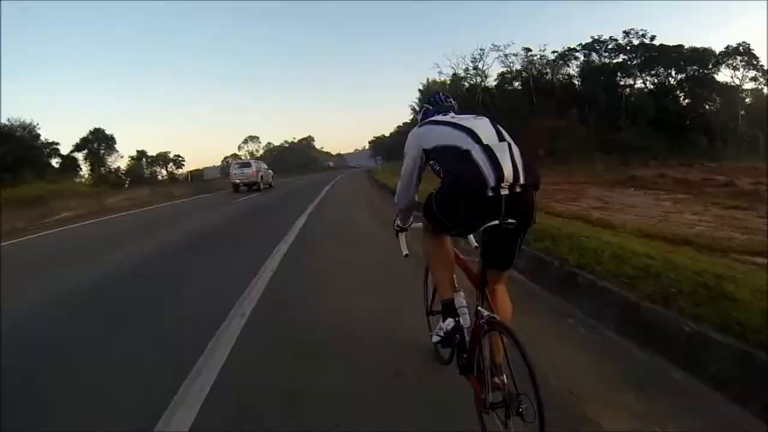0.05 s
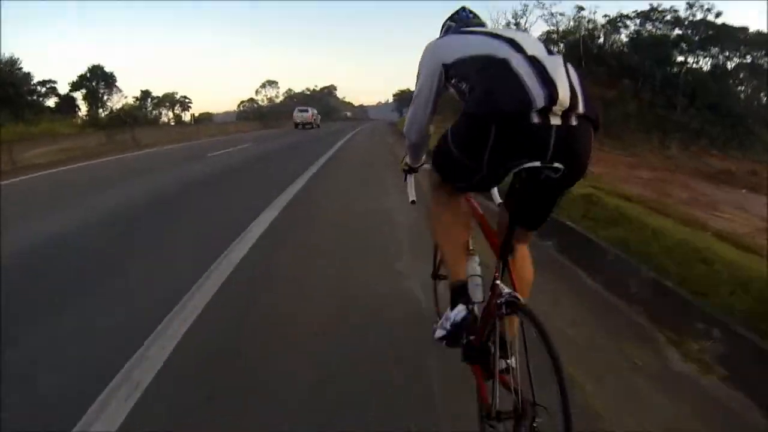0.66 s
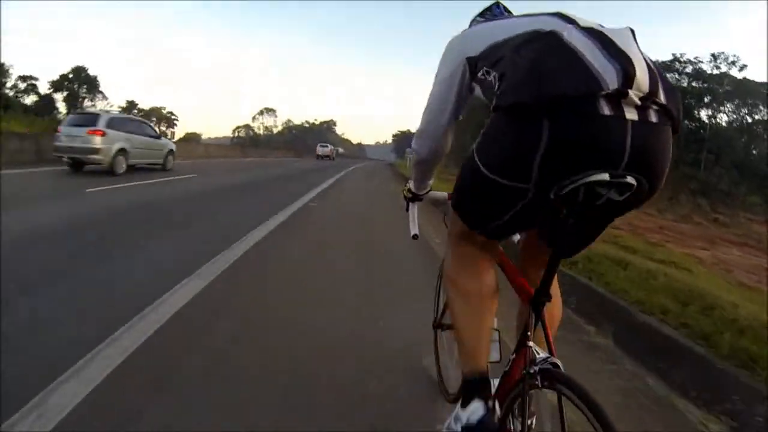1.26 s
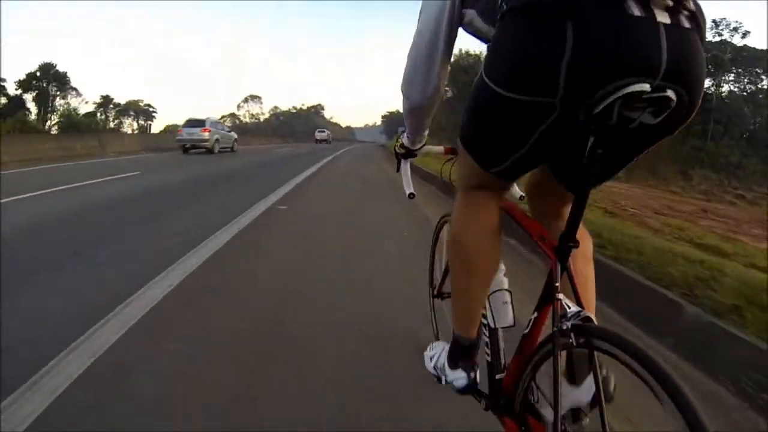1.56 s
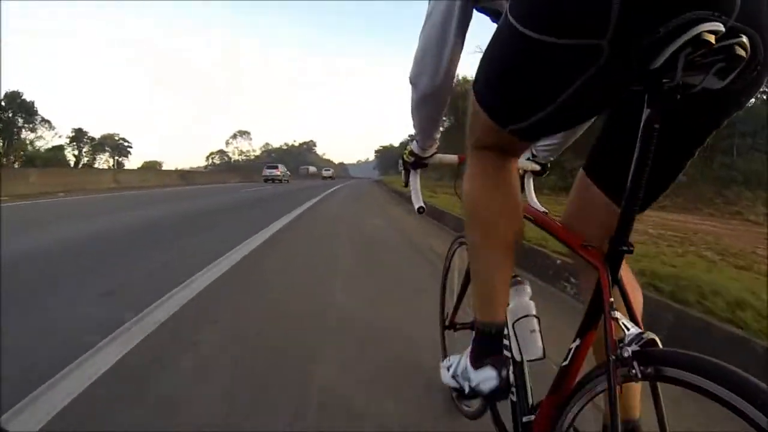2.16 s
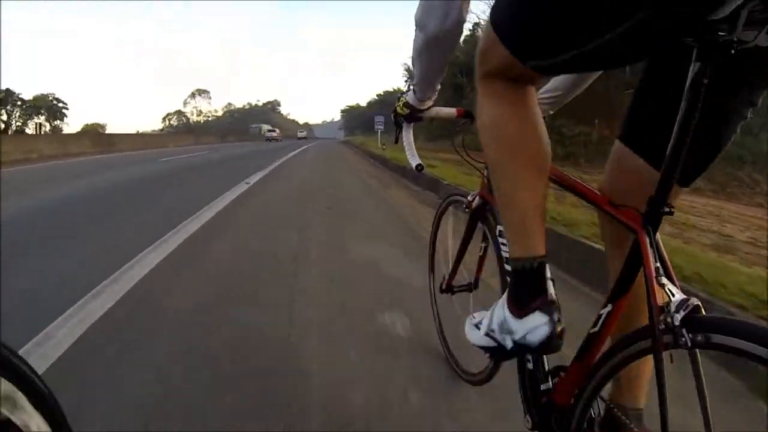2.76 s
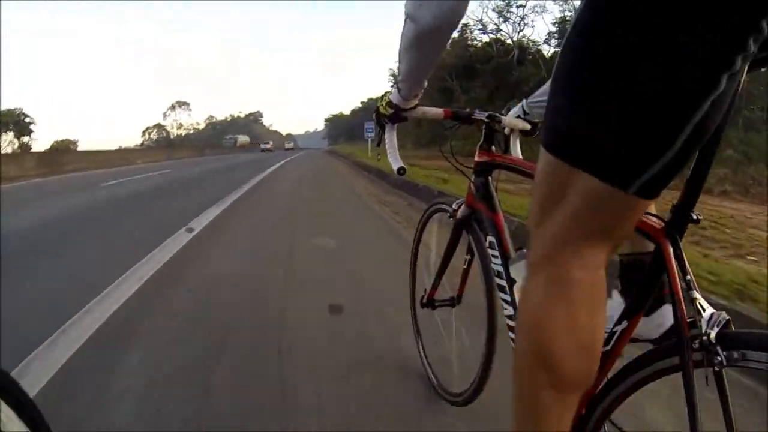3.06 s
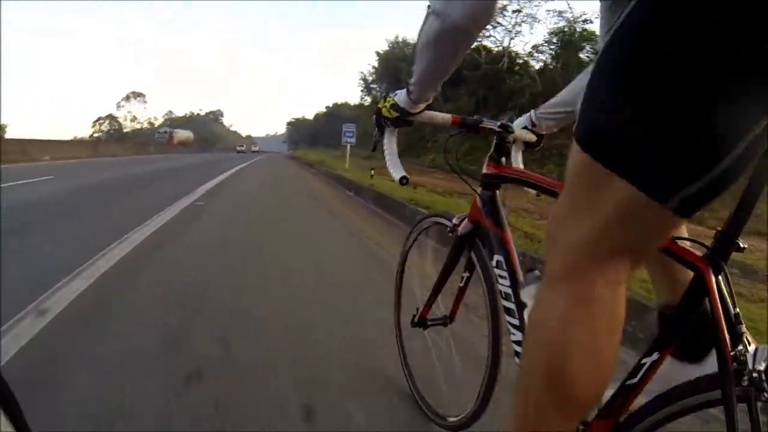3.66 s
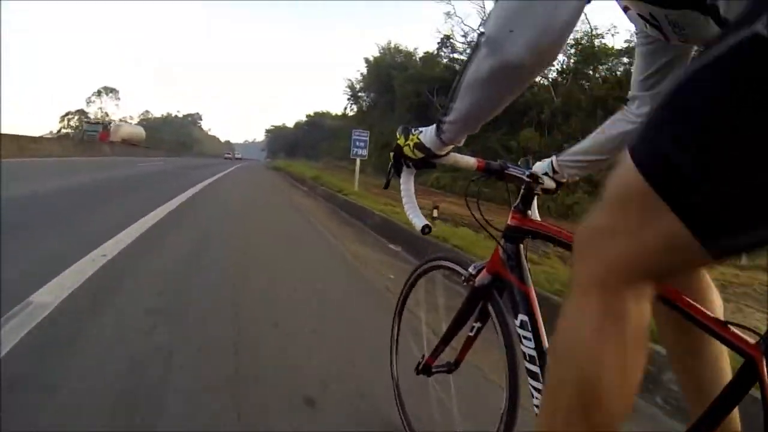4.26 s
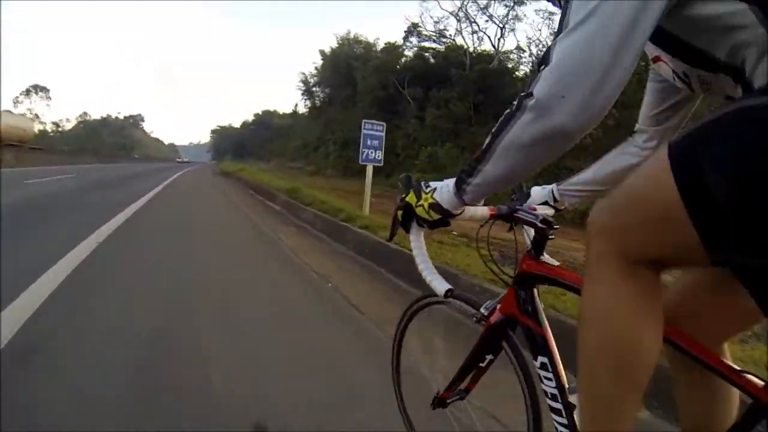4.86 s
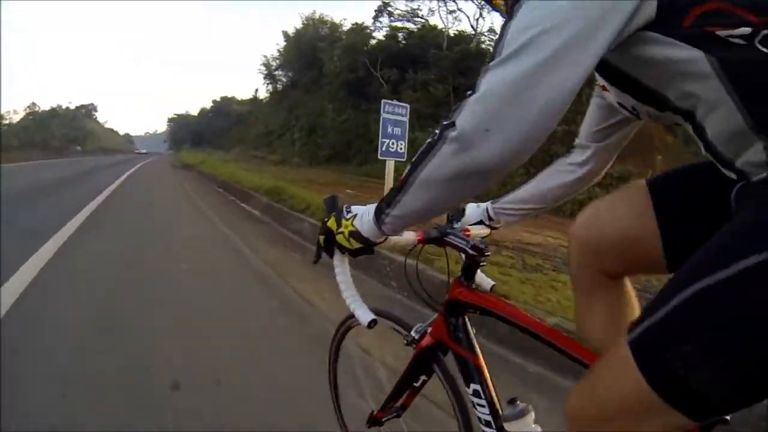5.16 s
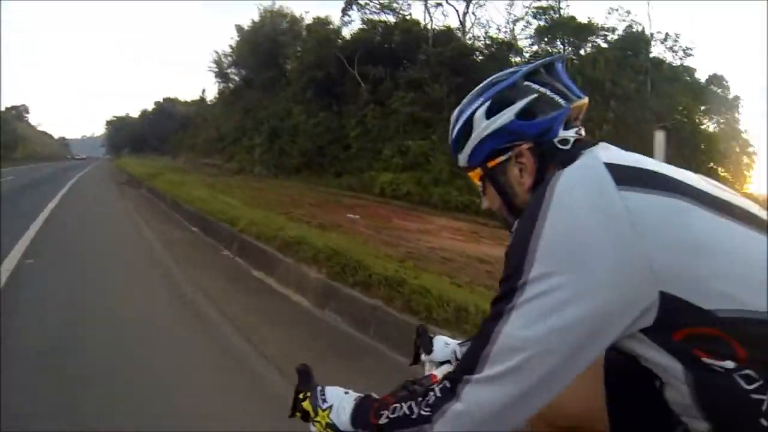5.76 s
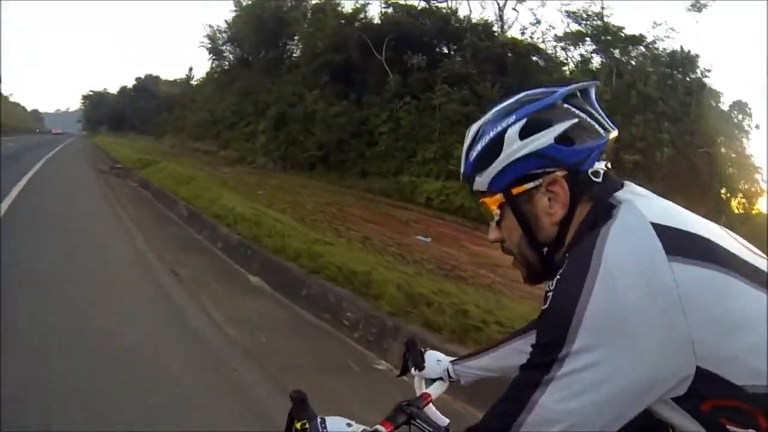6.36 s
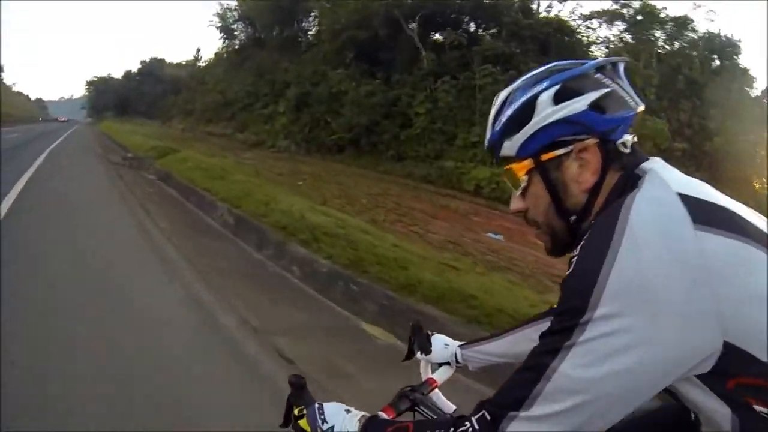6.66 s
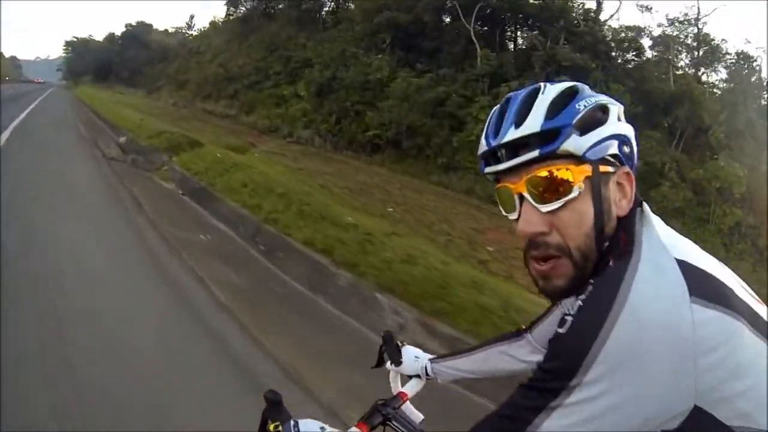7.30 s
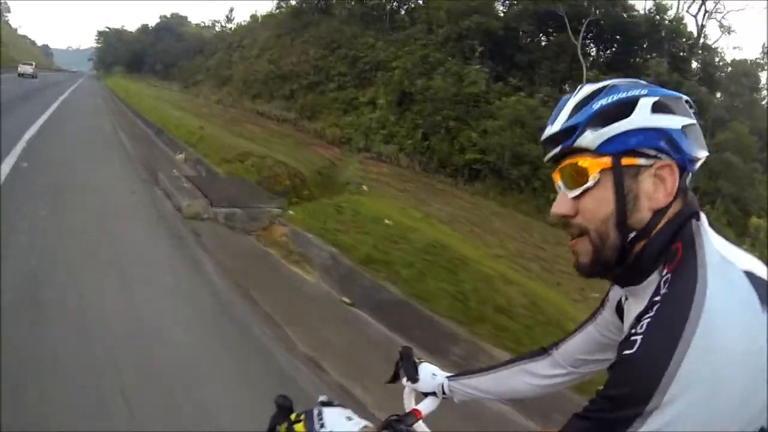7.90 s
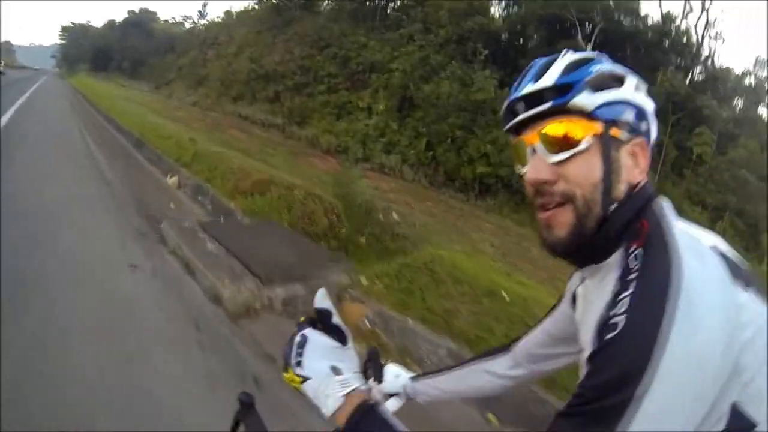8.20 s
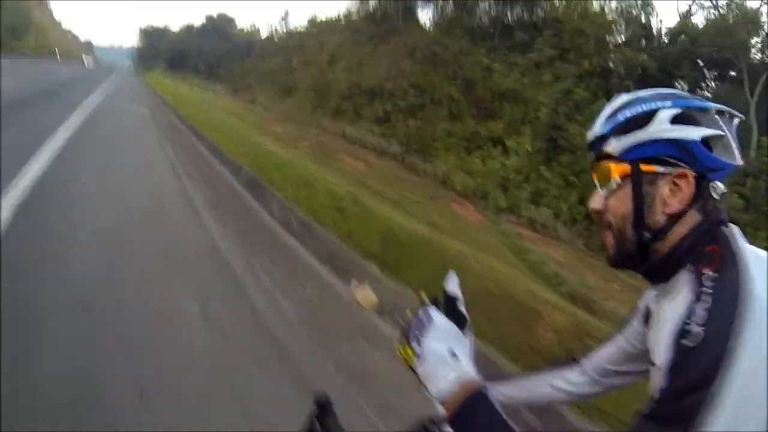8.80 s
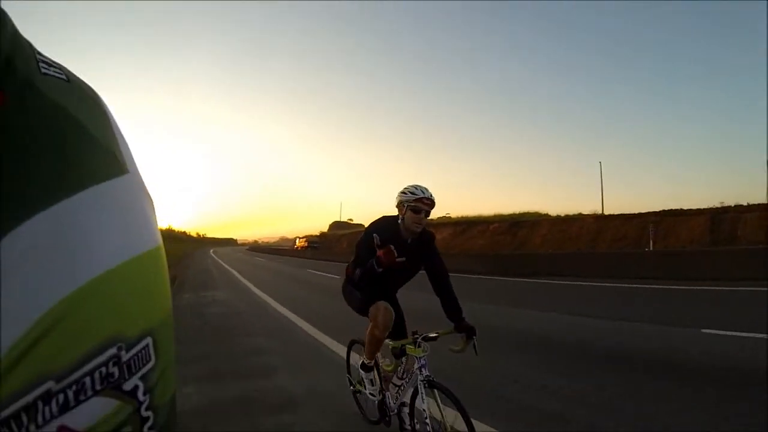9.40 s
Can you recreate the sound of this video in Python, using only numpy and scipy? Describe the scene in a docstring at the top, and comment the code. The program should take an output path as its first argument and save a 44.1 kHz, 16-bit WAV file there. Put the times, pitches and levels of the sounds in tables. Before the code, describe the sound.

A bicycle rides fast on asphalt, heard from a microphone in a plastic case mounted on it. Hollow road buzz, tyre hiss and low, gusting wind run throughout, with occasional soft thuds. The sound jumps abruptly just after the start. Four quick clacks with gritty scrapes come around 0.5 to 0.6 seconds, then a loud knock and another jump at 0.9. A second bicycle's chain chatters close by with a faint swish of spokes, fading after 5.4 seconds. Cars swell past at about 0.8, 1.4 and 5 to 6.3 seconds. The mount knocks sharply at 4.6 seconds and more lightly at 5.1, 5.6 and 5.9. A lorry's low drone creeps in, grows from 8 seconds and sinks slightly in pitch, drawing level with a rush of tyres at 8.7. It cuts off at 8.9, and a hard, ringing knock follows at 9.1 as the ride continues.

```python
"""Road bicycles riding fast on an asphalt hard shoulder; the microphone is in a plastic camera case on one.
From the start road buzz rings the case, tyres hiss, a neighbour's chain chatters close by and gusts
buffet the microphone. In the first second the levels jump abruptly twice and bumps knock the mount.
Cars swell up in the next lane, the chain drops back after 5 s, and a lorry draws level at 8.7 s.
A third jump cuts the lorry off, and one last hard knock follows."""
import sys
import numpy as np
from scipy import signal
from scipy.fft import rfft, irfft
from scipy.io import wavfile
from scipy.ndimage import uniform_filter1d, minimum_filter1d

SR = 44100
rng = np.random.default_rng(int(sys.argv[2]) if len(sys.argv) > 2 else 0)


def store_wav(level_fs):
    """Save 16-bit WAV to argv[1]."""
    pcm = np.round(np.clip(np.atleast_2d(level_fs), -1, 1) * 32767)
    wavfile.write(sys.argv[1], SR, pcm.T.astype(np.int16))


N = 420713
TIME = np.arange(N) / SR

# four stretches of the ride, each starting abruptly:
# (start [s], road buzz [dB], tyre hiss [dB], deep wind [dB], road roar [dB], lid rasp [dB])
RIDE_STRETCHES = [(0, -50, -66, -32, -75, -80), (0.075, -35, -74, -38, -75, -47.5),
                  (0.894, -40, -56.5, -41, -57, -61.5), (8.884, -36, -55, -47, -53.5, -61)]
# traffic in the next lane: (closest [s], half width [s], buzz in the case [dB], hiss [dB])
TRAFFIC_PASSES = [(0.78, 0.14, -26, -46.5), (1.35, 0.33, -36, -63), (3.38, 0.1, -38, -67),
                  (5.25, 0.75, -34, -71), (5.85, .22, -46, -48.5), (6.15, 0.23, -29.5, -49.5),
                  (8.8, 0.25, -26.5, -36.5)]
# gusts on the microphone: (middle [s], half width [s], deep buffeting [dB], higher flutter [dB])
WIND_GUSTS = [(.36, 0.14, -34, -58), (1.068, 0.023, -32, -69), (1.95, 0.38, -37.5, -55.5),
              (3.26, 0.11, -35, -54.5), (3.923, 0.14, -50, -46), (4.42, 0.33, -41, -49),
              (4.862, 0.072, -34, -49), (5.664, 0.39, -37, -51), (6.207, 0.048, -41, -53),
              (6.952, 0.05, -39, -44), (7.697, 0.11, -61.5, -44), (8.1, 0.18, -40, -47.5),
              (8.95, 0.53, -34.5, -55)]

# spectra at the microphone: (frequency [Hz], relative level [dB])
CASE_SPECTRUM = [(150, -23.5), (400, -26), (700, -26.5), (900, -21), (1080, -12), (1250, -3.5), (1380, 2),
                 (1500, 2.5), (1640, -3.5), (1850, -12.5), (2200, -27), (2900, -21), (3500, -28.5),
                 (4200, -44.5), (9000, -58)]  # the plastic case, shaken by the road
HISS_SPECTRUM = [(150, 3), (700, 0), (1400, 8.5), (2200, 0.5), (2600, 7), (3400, 6.5), (4150, -5.5),
                 (4750, -4), (5350, -5), (6700, -17), (7700, -15), (9000, -24), (10200, -23.5),
                 (15000, -48)]  # tyres, through the wall of the case
ROAR_SPECTRUM = [(50, -23), (100, 0.5), (190, 1.5), (330, -6), (700, -15), (1400, -19), (3000, -45)]  # low roar of wheels on asphalt
SPOKE_SPECTRUM = [(3800, -34), (4500, -19), (4800, 3.5), (5350, 4.5), (5900, -9.5), (6900, -16), (7500, -6),
                  (7950, -1), (8600, -19), (9400, -16.5), (10200, -5.5), (11000, -22), (15000, -26)]  # air through the neighbour's spokes
BUFFET_SPECTRUM = [(8, 0.5), (22, 7), (45, -4), (85, -7.5), (130, -15), (200, -26), (350, -28.5),
                   (700, -30), (2000, -78)]  # large eddies
FLUTTER_SPECTRUM = [(40, -9), (90, -3), (150, -1.5), (230, -8), (450, -31), (1500, -60)]  # small eddies
RASP_SPECTRUM = [(900, -33), (1700, -5), (2000, 0.5), (2300, -6.5), (2750, 1), (3100, -5), (3500, -13.5),
                 (4100, -29), (8000, -46.5)]  # the lid buzzing in its seat
SCRAPE_SPECTRUM = [(200, 5), (700, 0), (1400, 18), (2200, 9.5), (3000, 12), (4000, 2.5), (5100, 1.5),
                   (6000, -1.5), (7700, -11), (10500, -14), (15000, -41)]  # grit and the mount scraping
KNOCK_SPECTRUM = [(200, -40), (520, -46), (860, -22), (1110, -6.5), (1410, 5), (1780, -3.5), (2250, -18),
                  (3050, -19), (4050, -26), (5050, -25.5), (9100, -37.5), (13400, -46), (16100, -77)]  # the case, struck hard
SLIPSTREAM_SPECTRUM = [(500, -3), (3000, 9), (4100, -23), (5600, -15), (6800, -12), (7800, -3), (9200, -18),
                       (10600, -12), (15000, -25)]  # the lorry's slipstream on the case

# the neighbour's chain, drawing level and falling back: (time [s], level [dB])
NEIGHBOUR_LEVEL = [(0, -54), (.85, -53.5), (1.0, -67), (1.7, -50), (5.4, -52), (6.2, -61), (9.54, -70)]
# resonances of chain, sprockets and frame: (frequency [Hz], bandwidth [Hz], relative level [dB])
CHAIN_MODES = [(934, 120, 3.5), (3080, 113, 5), (2500, 390, -4), (4870, 440, -21), (7700, 260, -25)]
# soft thuds under the camera: (time [s], level [dB], rocking [Hz], ring time [s], rise time [s])
SOFT_THUDS = [(0.033, -8, 58, 0.0099, 0.0015), (0.646, -15, 22.1, 0.03, 0.0023),
              (0.866, -7.5, 35.8, 0.0069, 0.0033), (1.348, -12, 32.8, 0.016, 0.00062),
              (1.617, -22.5, 33.7, 0.035, 0.0012), (3.2906, -10.5, 106, 0.0036, 0.00078),
              (3.298, -19.5, 52.3, 0.018, 0.0017), (4.369, -19.5, 38, 0.023, 0.0025),
              (4.854, -21.5, 30.4, 0.027, 0.00044), (5.148, -16, 38, 0.012, 0.003)]
# thin ticks at the first and last jump: (time [s], level [dB])
JUMP_TICKS = [(0.0707, -24.5), (8.8815, -21)]
# scrapes of grit and of the mount: (middle [s], level [dB], half width [s], treble tilt [dB/octave])
GRIT_SCUFFS = [(0.488, -46, 0.018, 1), (0.56, -39, 0.026, -2), (0.595, -39, 0.0091, 1),
               (0.653, -39, 0.017, 1), (1.632, -48, 0.023, 0.5), (2.032, -42, 0.0022, 2),
               (3.293, -35, 0.0076, -9), (4.855, -37.5, 0.02, -2), (8.986, -49, 0.013, 5.5),
               (9.11, -22.5, 0.0089, -12)]
# hard knocks of the mount: (time [s], crack [dB], treble tilt [dB/octave], low push [dB],
# bracket ring [dB], lid rattle [dB], rebound delay [s])
MOUNT_KNOCKS = [(0.4899, -19, 5.5, -27, -36, -22, 0.00083), (0.5589, -8.5, 1.5, -24, -20.5, -9, 0.000876),
                (0.5998, -10, -7, -23, -31, -31, 0.00086), (0.6374, -4.5, -3, -5, -17, -16, 0.00072),
                (0.8957, 6, -3.5, -9, -45, -15.5, 0.00042), (4.5932, -2.5, -8.5, -11, -41, -22, 0.00044),
                (5.1476, -18.5, -8, -33, -57, -48, 0.00055), (5.583, -13.5, 0, -17, -33, -30, 0.00075),
                (5.881, -14.5, 2.5, -12.5, -34, -7.5, 0.00058), (9.1121, 3, -2.5, -2, -14, -15, 0.00079)]
# jolts to the metal clamp of the mount: (time [s], level [dB])
CLAMP_PINGS = [(2.031, -40), (3.292, -43), (9.102, -37), (9.1116, -15)]
# small parts right beside the microphone: (frequency [Hz], relative level [dB], t60 [s])
BRACKET_MODES = [(896, 0, 0.035)]
LID_MODES = [(2000, 11.5, 0.0088), (2440, 9, 0.0097), (3220, 10, 0.014), (3630, -13, 0.015),
             (4860, -10, 0.02), (5060, -16, 0.019), (7200, -20, 0.015), (11000, -24, 0.013)]
CLAMP_MODES = [(4680, -1, 0.022), (5230, -5, 0.035), (7080, -4, .012), (7700, -3, .012)]
# the lorry's engine, coming up in the next lane: (time [s], level [dB], firing rate [Hz])
LORRY_APPROACH = [(5.5, -66.5, 150), (6.8, -54.5, 150.3), (7.4, -62, 147.6), (8.1, -50, 147.3),
                  (8.4, -41.5, 145.7), (8.68, -42.5, 144), (8.88, -60, 135.5)]
# partials of its drone: (multiple of the firing rate [ratio], relative level [dB])
ENGINE_PARTIALS = [(1.079, -10.5), (1.4, -9.5), (2, -0.5), (2.56, -8.5), (4.24, -12)]


def gain_of(db):
    """Decibels to amplitude."""
    return 10 ** (np.asarray(db) / 20)


def unit_rms(x):
    """Scales to an rms of one."""
    return x / np.sqrt(np.mean(x ** 2) + 1e-20)


def curves(rows):
    """Each column of a table, joined by straight lines in time."""
    times, *columns = np.transpose(rows)
    return [np.interp(TIME, times, column) for column in columns]


def add(mix, s, sound):
    """Lays a sound into the mix at time s."""
    part = mix[max(round(s * SR), 0):][:len(sound)]
    part += sound[:len(part)]


def response(spectrum, tilt_db=0, size=8192):
    """Minimum-phase ring of a body with this spectrum, tilted by tilt_db per octave above 1500 Hz."""
    hz = abs(np.fft.fftfreq(size, 1 / SR))
    points_hz, points_db = np.transpose(spectrum)
    db = np.interp(np.log(hz + 1), np.log(points_hz + 1), points_db)
    db += tilt_db * np.log2(np.maximum(hz / 1500, 1))
    log_spectrum = np.conj(signal.hilbert(np.log(gain_of(db))))
    return np.fft.ifft(np.exp(log_spectrum)).real[:size // 2]


def coloured(drive, spectrum):
    """Passes a drive through a body; rms one."""
    return unit_rms(signal.oaconvolve(drive, response(spectrum))[:N])


def rush(spectrum):
    """Steady noise with this spectrum; rms one."""
    return coloured(rng.standard_normal(N), spectrum)


def resonate(drive, hz, width_hz, size):
    """Passes a drive through one damped resonance."""
    t = TIME[:size]
    ring = np.exp(-np.pi * width_hz * t) * np.sin(2 * np.pi * hz * t)
    return signal.oaconvolve(drive, ring)[:N]


def wander(hz, step_s=.002, size=8192):
    """Random drift up to about hz; rms one."""
    lowpass = np.exp(-(np.fft.rfftfreq(size, step_s) / hz) ** 2)
    slow = irfft(rfft(rng.standard_normal(size)) * lowpass)
    return unit_rms(np.interp(TIME, np.arange(size) * step_s, slow))


def grains(per_s, spread_db):
    """Random tiny impacts of uneven size; rms one."""
    size = gain_of(spread_db * np.minimum(rng.exponential(1, N), 4))
    return unit_rms(size * rng.choice([-1, 1], N) * (rng.random(N) < per_s / SR))


def rocking(hz, ring_s, rise_s):
    """A push sets the camera swinging on its mount."""
    t = TIME[:8192]
    return (1 - np.exp(-t / rise_s)) ** 2 * np.exp(-t / ring_s) * np.cos(2 * np.pi * hz * t)


def struck(modes):
    """Dying modes of a small part; peak one."""
    t = TIME[:2048]
    ring = sum((-1) ** k * gain_of(db - 60 * t / t60) * np.sin(2 * np.pi * hz * t)
               for k, (hz, db, t60) in enumerate(modes))
    return ring / abs(ring).max()


def stretch_at(s):
    """Which stretch of the ride a moment falls in."""
    return np.searchsorted([row[0] for row in RIDE_STRETCHES[1:]], s, side="right")


def same_stretch(s):
    """One throughout the stretch that holds the moment s, zero elsewhere."""
    return stretch_at(TIME) == stretch_at(s)


def nearness(closest_s, width_s):
    """Inverse distance of a straight pass by the microphone: one when closest, zero outside its stretch."""
    return same_stretch(closest_s) / np.hypot(1, (TIME - closest_s) / width_s)


def ride_gains(buzz_falloff=1.126, hiss_falloff=1.52):
    """Gains of the rushing layers: steady in each stretch, with traffic and gusts adding their power."""
    buzz, hiss, buffet, roar, rasp = gain_of(np.array(RIDE_STRETCHES)[stretch_at(TIME), 1:].T)
    flutter = np.zeros(N)
    for s, width_s, buzz_db, hiss_db in TRAFFIC_PASSES:
        near = nearness(s, width_s)
        buzz = np.hypot(buzz, gain_of(buzz_db) * near ** buzz_falloff)
        hiss = np.hypot(hiss, gain_of(hiss_db) * near ** hiss_falloff)
    for s, width_s, buffet_db, flutter_db in WIND_GUSTS:
        gust = same_stretch(s) * np.exp(-.5 * ((TIME - s) / width_s) ** 2)
        buffet = np.hypot(buffet, gain_of(buffet_db) * gust)
        flutter = np.hypot(flutter, gain_of(flutter_db) * gust)
    return buzz, hiss, buffet, flutter, roar, rasp


def camera_noise(hiss_db=-77, whine_db=-91, whine_hz=11470):
    """The camera's own faint hiss and steady whine."""
    hiss = gain_of(hiss_db) * rng.standard_normal(N)
    return hiss + gain_of(whine_db) * np.sin(2 * np.pi * whine_hz * TIME)


def road_buzz(gain):
    """Chips in the asphalt shake the bicycle, and the case around the microphone rings with each."""
    drive = grains(per_s=2200, spread_db=-2.0) + 0.9 * rng.standard_normal(N)
    return gain * gain_of(0.7 * wander(hz=11.3)) * coloured(drive, CASE_SPECTRUM)


def tyres(hiss_gain, roar_gain):
    """Smooth rush of tyres and traffic, heard through the case wall, over the low roar of the road."""
    hiss = hiss_gain * gain_of(.5 * wander(hz=27)) * rush(HISS_SPECTRUM)
    return hiss + roar_gain * rush(ROAR_SPECTRUM)


def tyre_hum(chain_db, relative_db=-7.5):
    """The neighbour's tyres hum roughly while that bicycle is close."""
    hum = resonate(rng.standard_normal(N), hz=311, width_hz=41, size=4096)
    return gain_of(chain_db + relative_db) * unit_rms(hum)


def chain(chain_db, links_hz=74, pedal_hz=3.1, surge_db=0.7, flutter_db=3.5, sway_db=3.0):
    """Close alongside, links drop onto the teeth in an uneven chatter that rings the sprockets."""
    links_passed = np.cumsum(links_hz * (1 + 0.019 * wander(hz=2.06))) / SR
    contact = 1 + .6 * np.cos(2 * np.pi * links_passed)
    tension_db = surge_db * np.cos(2 * np.pi * pedal_hz * TIME)  # tighter on each downstroke
    drive = contact * rng.standard_normal(N) * gain_of(tension_db + flutter_db * np.tanh(wander(hz=60)))
    rings = np.zeros(N)
    for hz, width_hz, db in CHAIN_MODES:
        gain = gain_of(db + sway_db * np.tanh(wander(hz=7.5)))  # shifts as the rider sways
        rings += gain * width_hz * resonate(drive, hz, width_hz, size=1024)
    return gain_of(chain_db) * unit_rms(rings)


def spokes(chain_db, relative_db=-18.5, swing_db=3.0):
    """Air through the neighbour's spokes: thin swishes that come and go at close range."""
    swish_db = chain_db + relative_db + swing_db * np.tanh(wander(hz=11))
    return gain_of(swish_db) * rush(SPOKE_SPECTRUM)


def wind(buffet_gain, flutter_gain, lumps_db=2.5):
    """Wind on the microphone: large and small eddies break on the case in the same lumps."""
    lumps = gain_of(lumps_db * wander(hz=26.2))
    buffet = coloured(lumps * rng.standard_normal(N), BUFFET_SPECTRUM)
    flutter = coloured(lumps * rng.standard_normal(N), FLUTTER_SPECTRUM)
    return buffet_gain * buffet + flutter_gain * flutter


def lid_rasp(gain):
    """Right by the microphone, the shaken lid buzzes against its seat."""
    return gain * coloured(grains(per_s=5000, spread_db=1.5), RASP_SPECTRUM)


def thuds():
    """Soft bumps only rock the camera."""
    out = np.zeros(N)
    for s, db, hz, ring_s, rise_s in SOFT_THUDS:
        add(out, s, gain_of(db) * rocking(hz, ring_s, rise_s))
    return out


def ticks():
    """A thin, one-sample tick just ahead of the first and the last jump in level."""
    out = np.zeros(N)
    for s, db in JUMP_TICKS:
        add(out, s, gain_of([db]))
    return out


def scuffs():
    """Grit and the mount scrape briefly as the pressure swells and eases."""
    out = np.zeros(N)
    grit = grains(per_s=9000, spread_db=-17)
    for s, db, width_s, tilt_db in GRIT_SCUFFS:
        span = abs(TIME - s) < .06
        pressure = np.exp(-((TIME[span] - s) / width_s) ** 2)
        ring = response(SCRAPE_SPECTRUM, tilt_db)
        scrape = signal.fftconvolve(pressure * grit[span], ring / np.linalg.norm(ring))
        add(out, TIME[span][0], gain_of(db) * scrape)
    return out


def knocks(rebound_db=-3.5, lid_lag_s=.0005):
    """Hard bumps come up the mount, push the camera and ring its case, bracket and lid."""
    out = np.zeros(N)
    push = rocking(hz=40, ring_s=.007, rise_s=.0003)
    for s, db, tilt_db, push_db, bracket_db, lid_db, rebound_s in MOUNT_KNOCKS:
        crack = response(KNOCK_SPECTRUM, tilt_db)
        crack = gain_of(db) * crack / abs(crack).max()
        add(out, s, crack)
        # the loose joint strikes again at once, which hollows each knock in its own way
        add(out, s + rebound_s, gain_of(rebound_db) * crack)
        add(out, s, -gain_of(push_db) * push)
        add(out, s, gain_of(bracket_db) * struck(BRACKET_MODES))
        add(out, s + lid_lag_s, gain_of(lid_db) * struck(LID_MODES))
    return out


def pings():
    """The metal clamp of the mount rings briefly when it is jarred."""
    out = np.zeros(N)
    for s, db in CLAMP_PINGS:
        add(out, s, gain_of(db) * struck(CLAMP_MODES))
    return out


def lorry(closest_s=8.72, hiss_falloff=1.52):
    """One lane away, a wavering engine drone sinks in pitch over wheel roar, tyre hiss and slipstream."""
    engine_db, firing_hz = curves(LORRY_APPROACH)
    firings = np.cumsum(firing_hz * (1 + 0.00815 * wander(hz=22))) / SR
    drone = sum(gain_of(db + 2.0 * wander(hz=5.5)) * np.sin(2 * np.pi * multiple * firings)
                for multiple, db in ENGINE_PARTIALS)
    engine = same_stretch(closest_s) * gain_of(engine_db) * drone
    roar = gain_of(-45.5) * nearness(closest_s, width_s=0.84) * rush(ROAR_SPECTRUM)
    # its many tyres carry from far off; the slipstream is heard only close up
    hiss = gain_of(-46) * nearness(closest_s, width_s=1.5) ** hiss_falloff * rush(HISS_SPECTRUM)
    slipstream = gain_of(-46) * nearness(closest_s, width_s=.17) ** 2 * rush(SLIPSTREAM_SPECTRUM)
    return engine + roar + hiss + slipstream


def scene():
    """Everything that reaches the one microphone on the bicycle."""
    buzz, hiss, buffet, flutter, roar, rasp = ride_gains()
    chain_db, = curves(NEIGHBOUR_LEVEL)
    mix = camera_noise() + road_buzz(buzz) + tyres(hiss, roar)
    mix += tyre_hum(chain_db) + chain(chain_db)
    mix += wind(buffet, flutter) + lorry()
    mix += thuds() + ticks() + scuffs() + knocks() + pings()
    mix += spokes(chain_db) + lid_rasp(rasp)
    return mix[None]


def record(dry, recovery_db_per_s=16, cutoff_hz=15200):
    """The camera's limiter ducks just ahead of an overload and recovers slowly; a low-pass follows."""
    over_db = 20 * np.log10(np.maximum(abs(dry[0]), 1))
    recovery_db = recovery_db_per_s * TIME
    duck_db = recovery_db - np.maximum.accumulate(over_db + recovery_db)
    duck_db = uniform_filter1d(minimum_filter1d(duck_db, size=161), size=121)  # look ahead, then smooth
    lowpass = signal.firwin(201, cutoff_hz, window=("kaiser", 8), fs=SR)
    return signal.oaconvolve(dry * gain_of(duck_db), lowpass[None], "same")


dry = scene()
out = record(dry)
store_wav(out)
```